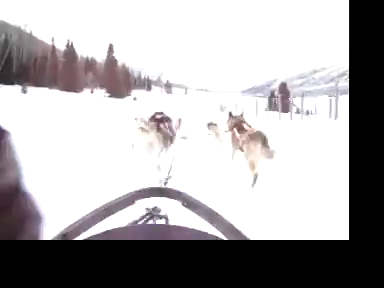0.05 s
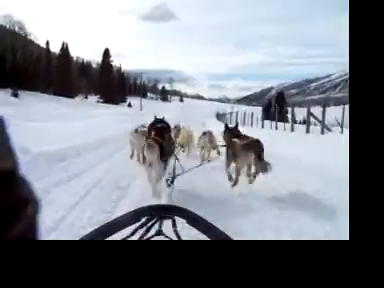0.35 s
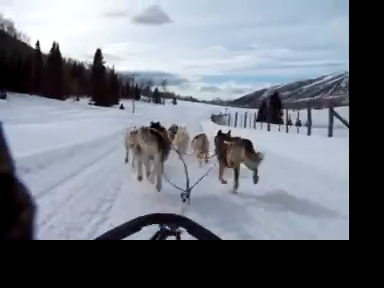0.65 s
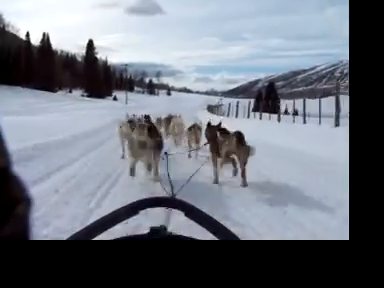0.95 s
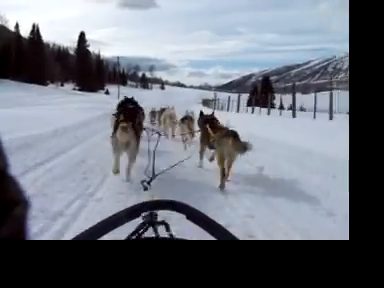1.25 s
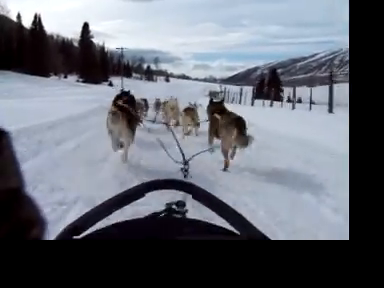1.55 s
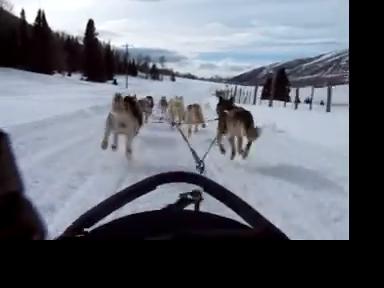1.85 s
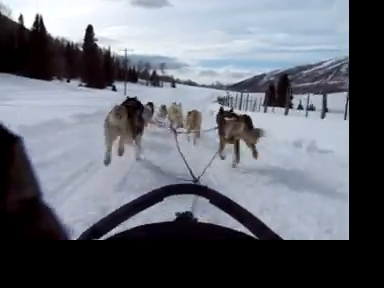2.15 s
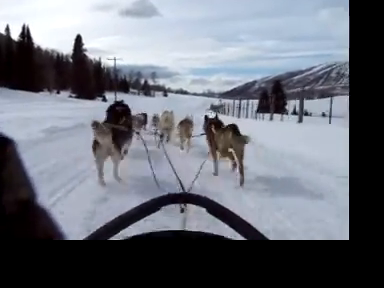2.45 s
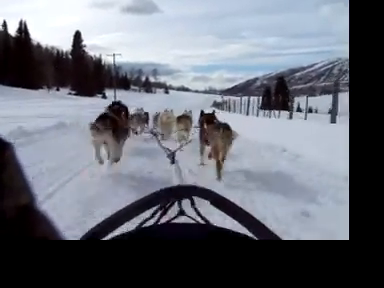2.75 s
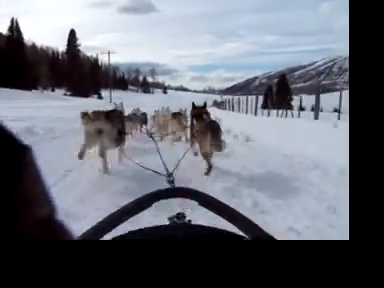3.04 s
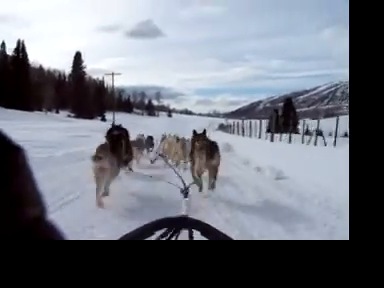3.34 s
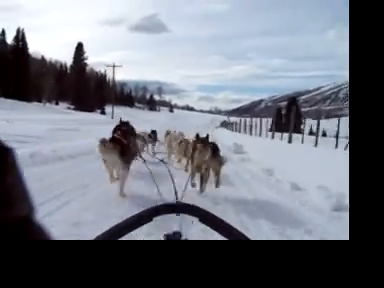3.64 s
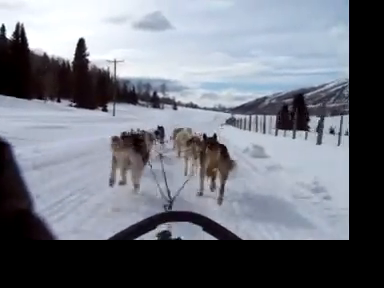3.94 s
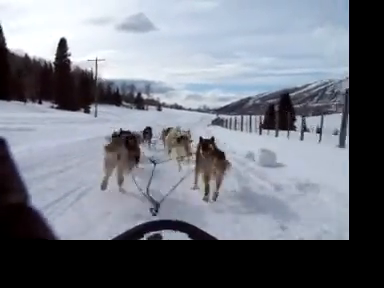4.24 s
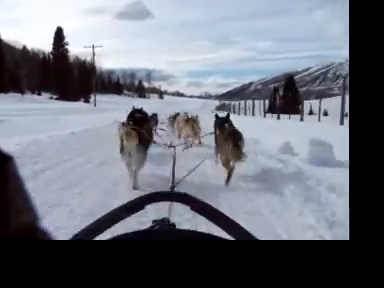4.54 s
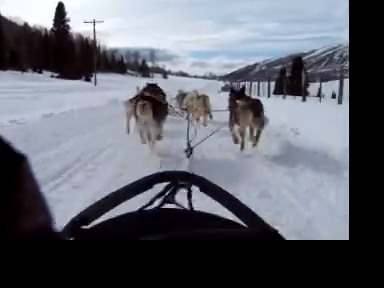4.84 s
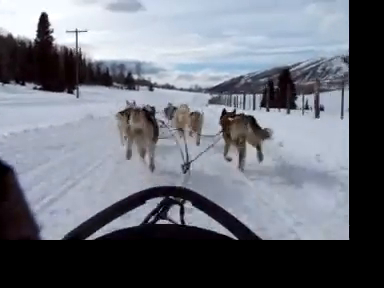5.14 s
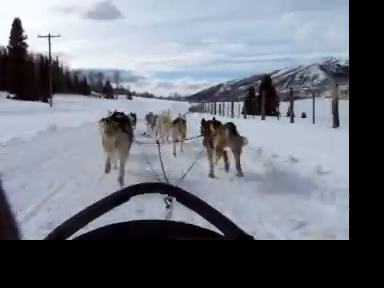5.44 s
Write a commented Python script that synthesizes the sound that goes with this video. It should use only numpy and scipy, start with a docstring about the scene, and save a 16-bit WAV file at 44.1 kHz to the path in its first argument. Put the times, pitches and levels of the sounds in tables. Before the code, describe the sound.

After a brief silence, wind fades in at about 0.3 seconds and dominates to the end, near 5.6 seconds. It beats directly on a small microphone riding on a sled outdoors: a low, throbbing rumble with quick, ragged gusts. Hard gusts land as dry slaps, strongest around 1.5, 2 and 4 seconds. Beneath the wind, the runners hiss softly over packed snow, swelling in irregular swishes with a slight crunch. The sled frame gives short, low booms over ruts, loudest at about 1.75 seconds, with smaller ones around 2.3 to 2.5 and from 3.5 to 4 seconds. Ice crumbs make tiny dry ticks close by, mostly between 3.8 and 4.6 seconds, the sharpest coming last. Deep wind thumps hit at roughly 0.7, 4.4 and 5.2 seconds, and the gusting carries on to the finish.

```python
"""On a dog sled over packed snow, the headwind beating on a small camera's microphone.
Slow eddies rumble and throb in the microphone port; strong gusts tear into small eddies and slap it.
The runners hiss through the snow, ice crumbs tick on the camera and the frame booms over ruts.
Gain control and a limiter duck the hardest blows."""
import sys
import numpy as np
from scipy import signal
from scipy.fft import rfft, irfft, next_fast_len
from scipy.io import wavfile
from scipy.ndimage import uniform_filter1d

SR = 44100
rng = np.random.default_rng(int(sys.argv[2]) if len(sys.argv) > 2 else 0)


def transcribe(u):
    """Save the signal u as a 16-bit wav file named by the first command-line argument.

    u: samples, shape (n,) or (channels, n), limited to [-1, 1]; the rate is SR.
    q: integer samples, one column per channel.
    """
    v = np.clip(np.atleast_2d(u).T, -1, 1)
    q = np.round(v * 32767).astype(np.int16)
    wavfile.write(sys.argv[1], SR, q)


N = 246078
TIME = np.arange(N) / SR
EDDY_HALF_SAMPLES = 3000


def amp(db):
    """Decibels to gain."""
    return 10 ** (np.asarray(db) / 20)


def unit(x):
    """Scales to rms 1."""
    return x / np.sqrt(np.mean(x ** 2) + 1e-20)


def follow(curve):
    """Interpolates (t/s, value) points at every sample."""
    return np.interp(TIME, *np.transpose(curve))


def bells(events):
    return sum(amp(db) * np.exp(-((TIME - at_s) / half_s) ** 2) for at_s, db, half_s in events)


def colour(x, spectrum):
    """Filters by (f/Hz, level/dB) points; rms 1."""
    hz, db = np.transpose(spectrum)
    size = next_fast_len(N + 8192)
    bins_hz = np.fft.rfftfreq(size, 1 / SR)
    gain = amp(np.interp(np.log(bins_hz + 1), np.log(hz), db))
    return unit(irfft(rfft(x, size) * gain, size)[:N])


def flutter(hz):
    """Low-passed noise, rms 1."""
    return unit(signal.sosfilt(signal.butter(2, hz, fs=SR, output="sos"), rng.standard_normal(N)))


def steady(x, samples):
    """Divides out the running rms."""
    power = uniform_filter1d(uniform_filter1d(x ** 2, samples), samples)
    return x / np.sqrt(abs(power) + 1e-9)


def add(mix, at_s, sound):
    """Mixes a sound in at a time."""
    part = mix[max(round(at_s * SR), 0):][:len(sound)]
    part += sound[:len(part)]


# Large-eddy spectrum: f/Hz, relative level/dB
RUMBLE_SPECTRUM = [(10, -31), (22, -2), (55, 3), (90, 3.5), (130, 4), (220, -22), (500, -84.5)]
# Large-eddy strength: t/s, level/dB
RUMBLE_LEVEL = [(0.5, -18.5), (0.61, -21.5), (0.73, -15), (0.75, -26), (1.12, -17.5), (1.16, -20.5),
                (1.91, -22.5), (2.08, -18.5), (2.18, -35.5), (2.46, -19), (2.83, -23.5), (4.47, -25.5),
                (4.53, -43), (4.69, -19), (5.03, -25), (5.2, -11.5), (5.27, -32), (5.58, -23)]


def rumble(gust, trim_db=-1, gust_db=-4):
    """Large, slow eddies rumble; gusts add to them."""
    noise = steady(colour(rng.standard_normal(N), RUMBLE_SPECTRUM), samples=3400)
    return noise * np.hypot(amp(follow(RUMBLE_LEVEL) + trim_db), amp(gust_db) * gust)


# Headwind between gusts: t/s, level/dB
BREEZE_LEVEL = [(.5,-29.5),(.95,-39),(1.2,-28.5),(1.65,-33),(2.3,-39.5),(2.8,-29.5),(3.42,-42.5),(3.7,-34.5),(4.2,-34.5),(4.9,-33.5),(5.3,-27),(5.47,-38)]
# Small-eddy spectrum: f/Hz, relative level/dB
TEAR_SPECTRUM = [(150, -30.5), (330, -11), (480, 6.5), (720, -0.5), (1000, -6.5), (1500, -12.5),
                 (2300, -19.5), (3200, -27), (5000, -45.5), (9000, -56.5)]
# Eddy fineness as treble lift: t/s, level/dB
TREBLE_LIFT = [(.4,-10.5),(.75,-4),(1.3,-1),(2,-5.5),(2.45,1),(2.8,-5.5),(3.2,-0.5),(3.55,0.5),(4.05,0),(4.4,0.5),(5.15,1),(5.58,0.5)]


def tearing(gust, pressure, throb, trim_db=1, gust_db=-1.5, ragged_db=2.5, fill=0.28, brighten=0.16):
    """The flow separates at pressure crests and breaks into small eddies."""
    flow = np.hypot(amp(follow(BREEZE_LEVEL)), amp(gust_db) * gust)
    excess_db = 20 * np.log10(flow / np.median(flow))
    crests = (pressure ** 2 + 0.042) ** 0.46
    spits = crests * amp(ragged_db * unit(1.2 * throb + flutter(hz=201)))
    spits = spits ** np.clip(amp(-fill * excess_db), 0.5, 1)  # merge into a roar in strong gusts
    tear = steady(colour(rng.standard_normal(N) * spits, TEAR_SPECTRUM), samples=800)
    treble = signal.sosfiltfilt(signal.butter(2, 1100, "high", fs=SR, output="sos"), tear)
    lift_db = brighten * excess_db + follow(TREBLE_LIFT)  # faster air sheds smaller eddies
    return (tear + treble * (amp(lift_db) - 1)) * flow * amp(trim_db)


# Mid-size eddies in the port: f/Hz, relative level/dB
PORT_SPECTRUM = [(40, -16), (90, -8), (140, -3.5), (195, 0), (260, -1.5), (330, -2), (420, -8), (600, -24),
                 (1000, -33), (2000, -45), (5000, -89.5)]
# Steady wind pressure in the port: t/s, level/dB
PORT_LEVEL = [(.5,-20),(.7,-17.5),(.84,-21),(1.1,-16.5),(1.45,-19.5),(1.65,-21),(1.8,-17),(2.1,-18),(2.35,-20),(2.5,-16.5),(2.85,-20),(3.1,-17.5),(3.42,-22.5),(3.9,-17),(4.2,-23.5),(4.8,-16),(5.1,-18.5),(5.58,-19.5)]


def port_wind(gust, gust_db=2.5, throb_db=3):
    """Mid-size eddies throb in the port as the flow surges and slackens; small ones tear off them."""
    throb = flutter(hz=41.7)
    noise = rng.standard_normal(N) * amp(throb_db * throb)
    pressure = steady(colour(noise, PORT_SPECTRUM), samples=1800)
    strength = np.hypot(amp(follow(PORT_LEVEL)), amp(gust_db) * gust)
    return pressure * strength + tearing(gust, pressure, throb)


# Snow friction spectrum: f/Hz, relative level/dB
SNOW_SPECTRUM = [(300, 5.5), (1000, 4), (2000, -0.5), (2750, 6.5), (3200, 1.5), (3850, 5.5), (4400, 3.5),
                 (5300, 3.5), (6300, -0.5), (7300, -5.5), (8200, -15.5), (9000, -42)]
# Runners biting into snow: t/s, level/dB, half width/s
RUNNER_SWISHES = [(.55,-41.5,0.11),(.76,-43,0.058),(1.0,-39.5,0.15),(1.38,-47.5,0.25),(1.82,-39.5,0.13),(2.22,-42.5,0.071),(2.5,-40,0.13),(2.75,-46,0.13),(3.035,-36.5,.025),(3.5,-39.5,0.048),(3.85,-46.5,0.3),(4.16,-48,0.045),(4.56,-44.5,0.062),(4.95,-41.5,0.22),(5.5,-41.5,0.12)]


def runners(trim_db=2.5, glide_db=-47, rut_db=-28, crunch_db=-8, grains_per_s=400, judder_db=2.17):
    """Snow crystals shear under the runners; coarse ones crunch. Swishes and ruts add load."""
    onsets = rng.random(N) < grains_per_s / SR
    grain_db = 4 * np.minimum(rng.exponential(1, N), 4)
    hiss = rng.standard_normal(N)
    crunch = unit(onsets * amp(grain_db) * rng.choice([-1, 1], N))
    friction = colour(hiss + amp(crunch_db) * crunch, SNOW_SPECTRUM)
    ruts = amp(rut_db) * bells(RUT_JOLTS)
    load = np.sqrt(amp(glide_db) ** 2 + bells(RUNNER_SWISHES) ** 2 + ruts ** 2)
    return friction * load * amp(trim_db + judder_db * flutter(hz=30.8))


# Ice striking the camera: t/s, peak level/dB
CRUMB_HITS = [(.424, -18), (1.911, -20), (3.8193, -16), (3.8823, -17.5), (4.19, -18), (4.418, -19.5),
              (4.587, -8), (5.458, -18)]


def ice_crumbs(case_hz=2700, rim_hz=4700, rim_db=-2, t60_s=0.0016, band_hz=(1800, 6000)):
    """Each crumb gives the plastic case one dry, heavily damped tick."""
    out, t = np.zeros(N), np.arange(300) / SR
    modes = np.sin(2 * np.pi * case_hz * t) + amp(rim_db) * np.sin(2 * np.pi * rim_hz * t)
    bandpass = signal.butter(4, band_hz, "band", fs=SR, output="sos")
    tick = signal.sosfilt(bandpass, modes * amp(-60 * t / t60_s))
    for at_s, db in CRUMB_HITS:
        add(out, at_s, amp(db) * tick / abs(tick).max())
    return out


# Gusts at the port's edge: start t/s, length/s, level/dB
GUST_EVENTS = [(0.531, 0.051, -22.5), (0.653, 0.086, -19), (0.772, 0.03, -19.5), (0.845, 0.054, -23.5),
               (1, 0.043, -24.5), (1.049, 0.04, -21), (1.15, 0.024, -31), (1.278, 0.18, -23.5),
               (1.476, 0.027, -13.5), (2.005, 0.029, -17.5), (2.047, 0.104, -20), (2.391, 0.052, -20.5),
               (2.45, 0.051, -28.5), (2.596, 0.036, -19.5), (2.654, 0.026, -21), (2.683, 0.2, -22),
               (2.919, 0.093, -23.5), (3.018, 0.11, -21.5), (3.134, 0.072, -27), (3.177, 0.035, -21),
               (3.218, 0.082, -22.5), (3.32, 0.084, -25), (3.476, 0.11, -20), (3.652, 0.032, -23),
               (3.772, 0.043, -20.5), (3.991, 0.248, -22), (4.237, 0.066, -20.5), (4.311, 0.18, -20.5),
               (4.501, 0.028, -22), (4.573, 0.026, -20.5), (4.615, 0.05, -22), (4.695, 0.049, -19.5),
               (4.756, 0.1, -22), (4.873, 0.075, -24), (5.186, 0.13, -19.5), (5.321, 0.03, -23.5),
               (5.36, 0.054, -21), (5.511, 0.079, -18.5)]


def gusts(attack_s=0.011, release_s=0.016, overhang_s=0.0041, sag_db=2):
    """Gust envelope: each rises quickly, sags and drops away."""
    out = np.zeros(N)
    for start_s, length_s, db in GUST_EVENTS:
        attack = np.clip((TIME - start_s) / attack_s, 0, 1)
        progress = np.clip((TIME - start_s) / length_s, 0, 1)
        release = np.clip((start_s + length_s + overhang_s - TIME) / release_s, 0, 1)
        out = np.maximum(out, amp(db + sag_db * (0.5 - progress)) * attack * release)
    return out


def eddy(base_hz, half_s, rise=0):
    """Pressure swings under a centred Gaussian; rise quickens them at the core."""
    t = np.arange(-EDDY_HALF_SAMPLES, EDDY_HALF_SAMPLES) / SR
    bell = np.exp(-(t / half_s) ** 2)
    cycles = rng.random() + np.cumsum(base_hz * (1 + rise * bell)) / SR
    return bell * np.sin(2 * np.pi * cycles)


# Hardest eddies: t/s, body level/dB, crack level/dB
EDDY_SLAPS = [(0.661, -8, -38), (1.056, -9, -39), (1.182, -9.5, -28), (1.285, -9, -21), (1.485, -3, -19.5),
              (2.02, -4.5, -32), (2.46, -11.5, -20.5), (2.576, -11.5, -29.5), (2.69, -8, -21),
              (2.944, -8.5, -16), (3.231, -12, -26), (3.56, -10.5, -34), (4.01, -4, -18.5),
              (4.261, -11, -23), (4.634, -13, -27), (5.154, -8.5, -36)]
# Very large eddies: t/s, level/dB, f/Hz, half width/s
EDDY_THUMPS = [(0.707, -12, 85, 0.016), (2.026, -19, 44.4, 0.03), (4.358, 1.5, 88, 0.0046),
               (5.133, -8.5, 81.4, 0.0071), (5.186, -8, 50.9, 0.021)]


def buffets(body_hz=320, crack_hz=1650, crack_trim_db=8, slap_delay_s=0.002034):
    """Single eddies cross the port: large ones thump, hard ones slap with a dry crack at the core."""
    out, lead_s = np.zeros(N), EDDY_HALF_SAMPLES / SR
    for at_s, db, hz, half_s in EDDY_THUMPS:
        add(out, at_s - lead_s, amp(db) * eddy(hz, half_s))
    for at_s, body_db, crack_db in EDDY_SLAPS:
        speed = rng.uniform(0.74, 1.15)
        body = amp(body_db) * eddy(body_hz * speed, half_s=0.0014, rise=1)
        crack = amp(crack_db + crack_trim_db) * eddy(crack_hz * speed, half_s=0.0004)
        add(out, at_s + slap_delay_s - lead_s, body + crack)
    return out


# Jolts over ruts: t/s, level/dB, half width/s
RUT_JOLTS = [(1.17,-17.5,0.024),(1.752,-2,0.015),(1.82,-14.5,0.015),(1.905,-14,0.02),(2.284,-10.5,.009),(2.49,-14,0.013),(3.5,-14.5,0.017),(3.675,-9.5,0.015),(3.912,-14,0.018),(3.95,-11.5,0.014)]
# Sled frame modes: f/Hz, bandwidth/Hz, relative level/dB
FRAME_MODES = [(198, 120, 19.5), (286, 110, -20), (353, 39, 13)]


def frame_booms():
    """Each rut shakes the sled; its frame booms in three low modes."""
    shaking = flutter(hz=496)
    boom = sum(amp(db) * signal.lfilter(*signal.iirpeak(hz, hz / width_hz, fs=SR), shaking)
               for hz, width_hz, db in FRAME_MODES)
    return bells(RUT_JOLTS) * steady(boom, samples=900)


def ducking(over_db, release_db_per_s):
    """Gain reduction in dB: fast attack, constant-rate release."""
    fall_db = TIME * release_db_per_s
    held_db = np.maximum.accumulate(np.maximum(over_db, 0) + fall_db) - fall_db
    return uniform_filter1d(held_db, size=40)


def scene():
    """Wind and sled at one microphone."""
    gust = gusts()
    wind = rumble(gust) + port_wind(gust) + buffets()
    return (wind + runners() + frame_booms() + ice_crumbs())[None]


def record(dry, open_s=0.336, fade_db=-8, fade_s=0.21, threshold_db=-14, squeeze=0.21, ceiling=0.7):
    """The microphone opens and fades up; then gain control, peak limiter and a steep low-pass."""
    x = dry[0] * np.clip((TIME - open_s) / 0.002, 0, 1)
    x = x * amp(fade_db * np.clip(1 - (TIME - open_s) / fade_s, 0, 1))
    power_db = 10 * np.log10(abs(uniform_filter1d(x ** 2, size=600)) + 1e-12)
    x = x * amp(-squeeze * ducking(power_db - threshold_db, release_db_per_s=45))
    over_db = 20 * np.log10(abs(x) / ceiling + 1e-9)
    x = x * amp(-ducking(over_db, release_db_per_s=130))
    lowpass = signal.firwin(401, cutoff=8900, window=("kaiser", 9), fs=SR)
    return signal.oaconvolve(np.clip(x, -ceiling, ceiling), lowpass, "same")[None]


dry = scene()
out = record(dry)
transcribe(out)
```